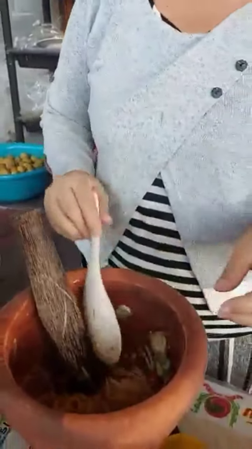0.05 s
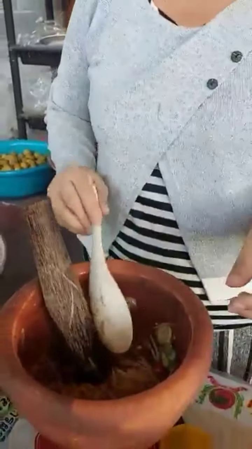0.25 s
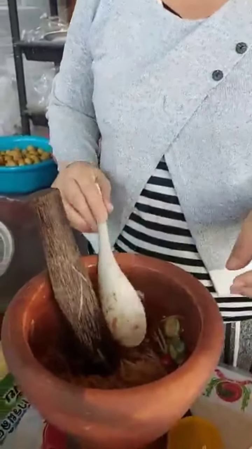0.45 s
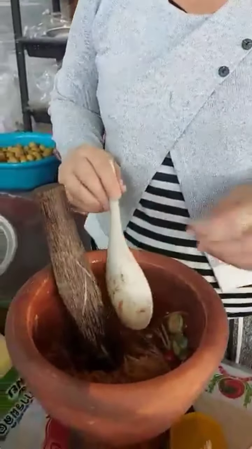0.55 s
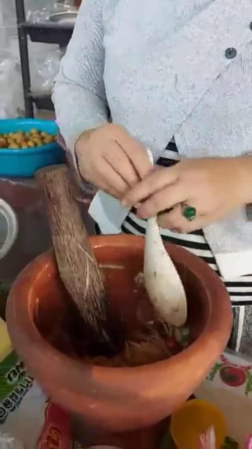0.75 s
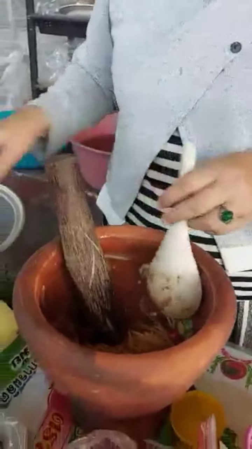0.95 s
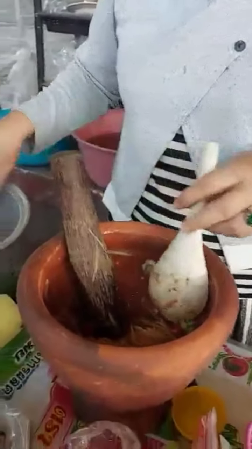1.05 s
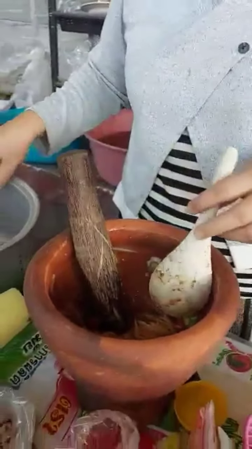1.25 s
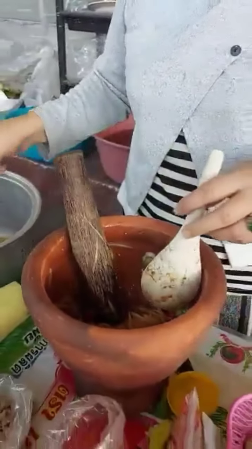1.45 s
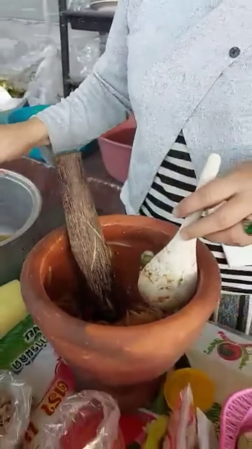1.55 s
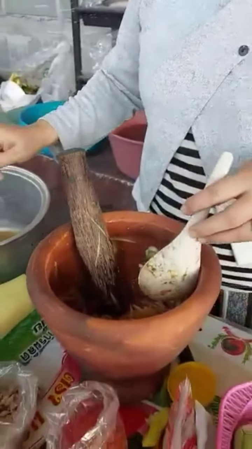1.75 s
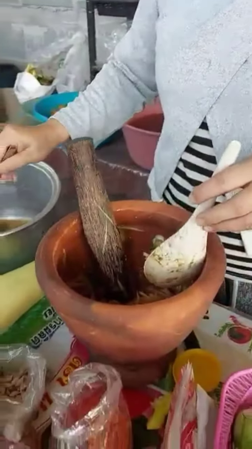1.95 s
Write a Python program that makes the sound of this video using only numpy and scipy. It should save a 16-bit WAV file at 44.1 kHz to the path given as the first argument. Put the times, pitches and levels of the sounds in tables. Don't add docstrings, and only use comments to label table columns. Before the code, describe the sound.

A plastic spoon knocks hard on a clay mortar, with wet scrapes and faint outdoor hiss.

```python
import sys
import numpy as np
from scipy import signal
from scipy.fft import rfft, irfft
from scipy.io import wavfile
from scipy.ndimage import uniform_filter1d

SR = 44100
rng = np.random.default_rng(int(sys.argv[2]) if len(sys.argv) > 2 else 0)


def magnitude_from_level(level_db):
    exponent = np.asarray(level_db, float) / 20
    return 10 ** exponent


def put_to_file(sound):
    columns = np.atleast_2d(sound).T
    safe = np.clip(columns, -1, 1)
    whole_steps = np.round(safe * 32767)
    wavfile.write(sys.argv[1], SR, whole_steps.astype(np.int16))


N = 88200
SIDES = np.array([[.5], [-.5]])


def evened(x):
    return x / np.sqrt(np.mean(x ** 2) + 1e-20)


def read(points, hz):
    f, value = np.transpose(points)
    return np.interp(np.log(hz + 1), np.log(f + 1), value)


def add(mix, s, sound):
    part = mix[:, round(s * SR):][:, :sound.shape[-1]]
    part += sound[..., :part.shape[1]]


def ring(hz, db, t60, pan_db=0, lead=0, rise=.0003, settle=1):
    t = np.arange(SR // 2) / SR
    muting_db = 330 * np.maximum(t - settle, 0)
    fade = magnitude_from_level(db + pan_db * SIDES - 60 * t / t60 - muting_db) * (1 - np.exp(-t / rise))
    return fade * np.sin(2 * np.pi * hz * t + lead * SIDES)


def resonate(x, hz, width):
    turn = np.exp(2j * np.pi * np.cumsum(hz * np.ones(len(x))) / SR)
    r = np.exp(-np.pi * width / SR)
    smooth = signal.lfilter([1], np.convolve([1, -r], [1, -r]), x / turn)
    return 2 * (turn * smooth).real


def coloured(x, gain_of_hz):
    return irfft(rfft(x) * gain_of_hz(np.fft.rfftfreq(x.shape[-1], 1 / SR)), x.shape[-1])


# frequency in Hz, level in dB per Hz.
AIR_COLOUR = [(76, -55.5), (130, -18.5), (239, -2.5), (421, -12.5), (576, -15), (2810, -20.5),
              (7930, -32.5), (12400, -26.5), (14000, -67.5)]
# frequency in Hz, likeness from 0 to 1.
AIR_LIKENESS = [(60, 0.78), (180, 0.81), (550, 0.34), (1650, 0.01), (4970, 0.016), (15000, 0.11)]


def air():
    frames, hz = N // 256 + 5, np.fft.rfftfreq(1024, 1 / SR)
    a, b, c, d, patches = rng.standard_normal((frames, 513, 5)).T
    patches = uniform_filter1d(patches, size=12, axis=0)
    patches = evened(uniform_filter1d(patches, size=9, axis=1))
    same = np.clip(read(AIR_LIKENESS, hz), -1, 1)[:, None]
    left = a + 1j * b
    right = same * left + np.sqrt(1 - same ** 2) * (c + 1j * d)
    colour_db = read([(30, -47.5), (70, -14)] + list(AIR_COLOUR), hz)[:, None]
    z = np.array([left, right]) * magnitude_from_level(colour_db + 2.4 * patches)
    return magnitude_from_level(-56.5) * evened(signal.istft(z, nperseg=1024, noverlap=768)[1][:, :N])


# frequency in Hz, level in dB, t60 in seconds.
EXHAUST_MODES = [(103.5, -32, 0.1), (141, -67.5, 0.082), (230, -49, 0.093)]
FIRST_FIRE_S, FIRE_GAP_S, FIRE_JITTER_S, OFFBEAT_DB = 0.01586, .0773, 0.0043, -9
# centre in seconds, half length in seconds, level in dB.
RUMBLE_SWELLS = [
    (0.225, 0.059, -38.5),
    (0.844, 0.036, -46.5),
    (1.047, 0.068, -45),
    (1.86, 0.068, -46),
    (1.99, 0.0297, -44.5),
]


def engine():
    out = np.zeros((2, N))
    puff = sum(ring(*mode, rise=0.011) for mode in EXHAUST_MODES)
    for k, late in enumerate(rng.standard_normal(52)):
        start = abs(FIRST_FIRE_S + k * FIRE_GAP_S / 2 + FIRE_JITTER_S * late)
        add(out, start, magnitude_from_level(OFFBEAT_DB * (k % 2)) * puff)
    t = np.arange(N) / SR
    wobble = resonate(rng.standard_normal(N), hz=48.6, width=36.6)
    wobble /= np.sqrt(uniform_filter1d(wobble ** 2, size=4000))
    swells = sum(magnitude_from_level(db) * np.exp(-((t - s) / half) ** 2) for s, half, db in RUMBLE_SWELLS)
    return out + wobble * (magnitude_from_level(-54.5) + swells)


# time in seconds, pitch in Hz, level in dB.
SQUEAL_PATH = [(1.5, 10000, -90), (1.56, 10200, -73), (1.66, 10400, -73), (1.74, 11800, -70),
               (1.81, 10900, -72), (1.9, 11200, -75), (2, 11500, -82)]


def squeal():
    s, hz, db = np.transpose(SQUEAL_PATH)
    t = np.arange(N) / SR
    pitch = uniform_filter1d(np.interp(t, s, hz), size=1500)
    voices = np.array([resonate(v, pitch, 220) for v in rng.standard_normal((2, N))])
    return magnitude_from_level(np.interp(t, s, db)) * evened(voices)


# start in seconds, length in seconds, level in dB,
# then start, middle and end pitch in Hz.
CHICK_CALLS = [
    (1.556, 0.091, -58, 4160, 3680, 2780),
    (1.607, 0.034, -55, 1260, 1163, 1060),
    (1.74, 0.09, -57, 3430, 4070, 3100),
    (1.921, 0.039, -56.5, 4330, 4460, 4500),
]


def chick():
    out = np.zeros((2, N))
    for (s, length, db, *hz), breath in zip(CHICK_CALLS, rng.standard_normal((len(CHICK_CALLS), 2, 5000))):
        u = np.linspace(0, 1, round(length * SR))
        glide = np.polyval(np.polyfit([0, .5, 1], hz, deg=2), u)
        width = .125 * hz[1]
        call = evened(np.array([resonate(v[:len(u)], glide, width) for v in breath]))
        add(out, s, magnitude_from_level(db) * np.sin(np.pi * u) ** 0.46 * call)
    return out


# frequency in Hz, level in dB, t60 in seconds.
PAN_MODES = [(885, -52, 0.25), (1755, -52, 0.27), (2085, -53.5, 0.3), (2920, -49.5, .06),
             (3190, -53, 0.068), (3650, -54.5, 0.11), (4210, -56, .08), (4500, -56.5, .1),
             (4900, -57, 0.11), (5230, -56.5, 0.083), (6000, -58, 0.2), (2336, -60, .3), (3854, -59, .09),
             (6476, -60, .15)]
PAN_S, RATTLE_S, RATTLES_PER_S, FIRST_BLOW = 1.8195, .06, 150, 2.4


def pan():
    out = np.zeros((2, N))
    chance, size = rng.random((2, 8000))
    rattle = (chance < RATTLES_PER_S / SR) * (2 * size - 1) * (np.arange(8000) < RATTLE_S * SR)
    rattle[0] = FIRST_BLOW
    modes = sum(ring(*mode, pan_db=-0.5, lead=1.76 * rng.standard_normal(), rise=0.00085)
                for mode in PAN_MODES)
    add(out, PAN_S, signal.fftconvolve(modes, rattle[None], axes=1))
    return out


# start in seconds, level in dB, pitch in Hz, t60 in seconds.
SINGLE_RINGS = [(1.2615, -38.5, 480, 0.04), (1.2625, -43, 693, 0.059), (1.263, -46, 220, 0.05),
                (1.264, -50.5, 1633, 0.038), (1.3, -50, 338, .1), (1.353, -40.5, 323, 0.096),
                (1.377, -42, 356, 0.089), (1.36, -56.5, 700, 0.12), (1.831, -44.5, 333, 0.54),
                (1.914, -46, 339, 0.15), (.147, -36, 790, .04), (.155, -42, 700, .05), (.184, -42, 880, .05),
                (1.03, -48, 215, .1), (1.04, -53, 650, .08), (1.822, -46, 225, .1), (.9172, -36, 1790, .03),
                (.9172, -37, 1120, .035), (.9172, -39, 1480, .025), (.2158, -16, 1010, .02),
                (.2158, -26, 560, .03), (.4268, -9, 2790, .028), (.4256, -17, 5500, .014),
                (.4256, -22, 6500, .012), (.3976, -24, 1000, .02), (.428, -30, 1770, .1),
                (.462, -36, 2900, .08), (.497, -49, 2075, 0.2), (.556, -49, 1920, 0.15),
                (1.862, -52, 2960, .1), (1.903, -53, 3780, .05)]


def single_rings():
    out = np.zeros((2, N))
    for s, db, hz, t60 in SINGLE_RINGS:
        add(out, s, ring(hz, db, t60, pan_db=1.0, lead=-.1, rise=0.0012))
    return out


# start in seconds, length in seconds, level in dB,
# centre in Hz, width in octaves.
WET_SCRAPES = [(0.027, 0.064, -51.5, 8940, 3), (0.15, 0.11, -45, 2175, 1.63),
               (0.145, 0.0048, -36.5, 2580, 0.68), (0.1546, 0.0099, -43, 3260, 0.4),
               (.428, 0.033, -42.5, 5040, 0.25), (1.288, 0.029, -57.5, 3000, 0.75),
               (0.175, 0.022, -44, 1676, 0.69), (.211, 0.019, -34, 3940, 0.56),
               (0.3934, 0.0047, -35, 6000, 3.8), (0.3962, 0.0047, -21, 8050, 1.1),
               (0.235, 0.0089, -46, 4300, 0.6), (0.252, 0.013, -41.5, 5520, 0.33),
               (0.234, 0.081, -49, 4500, 1.6), (0.402, 0.081, -37, 2970, 1.13),
               (0.426, 0.11, -43, 4000, 0.68), (0.542, 0.039, -51.5, 6970, 1.7),
               (0.578, 0.35, -57, 4480, 0.3), (0.722, 0.22, -54.5, 8000, 3.5),
               (1.004, 0.133, -48.5, 6000, 3.7), (1.014, 0.1, -48.5, 2960, 0.49),
               (1.031, 0.065, -46, 1990, 0.29), (1.2078, 0.0092, -48, 6400, 1.6),
               (1.263, 0.011, -44, 7000, 6.5), (0.221, 0.095, -40, 453, 1.43),
               (0.429, 0.11, -44.5, 450, 0.47), (1.356, 0.056, -55, 7000, 2.4),
               (1.8107, 0.052, -42, 7060, 1.4), (1.825, 0.28, -52, 1400, 1.4),
               (1.886, 0.07, -49.5, 1433, 1.1)]


def scrapes():
    out = np.zeros((2, N))
    draws = rng.standard_normal((len(WET_SCRAPES), 3, 10000))
    for (s, length, db, hz, octaves), (left, right, clumps) in zip(WET_SCRAPES, draws):
        u = np.arange(min(round(length * SR), 10000)) / (length * SR)
        grain = magnitude_from_level(0.55 * evened(uniform_filter1d(clumps, size=60)))
        noise = coloured(np.array([left, right]) * grain,
                         lambda f: np.exp(-.5 * (np.log2((f + 1) / hz) / octaves) ** 2))
        shape = np.minimum(u / .15, 1) * np.cos(np.pi / 2 * u) ** 1.2
        add(out, s, evened(noise)[:, :len(u)] * shape * magnitude_from_level(db))
    return out


# frequency in Hz, level in dB, t60 in seconds,
# left-right difference in dB, left lead in radians.
SPOON_MODES = [(156, -28, 0.16, -3, 1), (514, -28.5, 0.083, 5, -1.85), (710, -25, 0.039, -14.5, -3),
               (1059, -4.5, 0.036, 3, 1.02), (1763, -7.5, 0.031, 0.5, 1.32), (2348, -1, 0.021, 9.5, -1.5),
               (2550, -5, 0.034, -1, -0.3), (2923, -7, 0.024, -3.5, 0.2), (3380, -20, 0.017, 0.5, -3.5),
               (3780, -7.5, 0.017, -10, -0.3), (4806, 8, 0.0075, 5.5, 3), (5180, -20.5, 0.013, 8, -4.5),
               (4360, -16, .011, 1.5, 9.2), (6170, -8.5, 0.013, 4.5, 3.47)]
PRESSED_DB, PRESSED_RING = -25, .5


def spoon(body_db, high_db, crack_db):
    softness_db = min(crack_db - body_db + 16.5, 0)
    stretch = PRESSED_RING if high_db - body_db < PRESSED_DB else 1
    out = 0
    for hz, db, t60, *sides in SPOON_MODES:
        tilt_db = 0.858 * softness_db * max(np.log2(hz / 2000), 0)
        scatter_db = 1.5 * rng.standard_normal()
        out = out + ring(hz, body_db + db + scatter_db + tilt_db, t60 * stretch, *sides, rise=0.002)
    return out


# frequency in Hz,
# level in dB, t60 in seconds, left-right difference in dB, left lead in radians.
WALL_RINGS = [(901, 2, 0.29, -.5, -1.02), (2348, -7.5, .135, 18, 0), (2348, -11, .31, -22, 0),
              (2334, -20, .3, -22, -3.4), (4230, -23, 0.15, -10, 1.4), (2344, -27, .55, -8, 0)]
LET_GO_S, LIGHT_RING = .6, 1.82
SETTLE_S = .103


def mortar_wall(s, low_db, high_db):
    lightness = LIGHT_RING if s > LET_GO_S else 1
    out = 0
    for k, (hz, db, t60, *sides) in enumerate(WALL_RINGS):
        level_db = db + (low_db if k == 0 else high_db)
        stretch = lightness if k == 0 else 1
        settle = 1 if k == len(WALL_RINGS) - 1 else SETTLE_S * lightness
        out = out + ring(hz, level_db, t60 * stretch, *sides, rise=0.0024, settle=settle)
    return out


# frequency in Hz, level in dB.
CRACK_COLOUR = [(1500, 1.5), (4000, 7.5), (7000, -10.5), (10000, -2.5), (13000, -24), (15500, -38)]


def crack(crack_db):
    t = np.arange(2048) / SR
    grit = coloured(rng.standard_normal((2, len(t))), lambda hz: magnitude_from_level(read(CRACK_COLOUR, hz)))
    return evened(grit) * magnitude_from_level(crack_db + 1.5 * SIDES - 60 * t / 0.016)


# start in seconds, then levels in dB of spoon body, low wall ring,
# high wall ring and crack.
SPOON_KNOCKS = [(.1468, -17, -64, -63.5, -36.5), (.1545, -31, -64, -56.5, -36),
                (.181, -40, -59.5, -57, -59), (.1853, -22.5, -58.5, -51, -45.5),
                (.192, -44, -61, -53, -61.5), (0.2154, -3.5, -23, -16, -18),
                (0.3974, -7.5, -87, -43.5, -18), (.4238, -22, -23, -19, -28),
                (0.4254, -5.5, -22.5, -15.5, -11), (.917, -25, -41.5, -46.5, -78),
                (.9593, -41.5, -46, -51, -43.5)]


def knocks():
    out = np.zeros((2, N))
    for s, body_db, low_db, high_db, crack_db in SPOON_KNOCKS:
        add(out, s, spoon(body_db, high_db, crack_db))
        add(out, s, mortar_wall(s, low_db, high_db))
        add(out, s, crack(crack_db))
    return out


# frequency in Hz, t60 in seconds.
YARD_DECAY = [(1000, 0.27), (3000, 0.33), (8000, 0.033)]


def yard(x):
    taps = np.zeros((2, SR // 2))
    at = np.arange(640, SR // 2 - 20, 20)
    places = at + rng.integers(0, 20, (2, len(at)))
    np.put_along_axis(taps, places, rng.choice([-1., 1.], (2, len(at))), 1)
    hz, t, z = signal.stft(taps, SR, nperseg=256)
    tail = signal.istft(z * magnitude_from_level(-60 * t / read(YARD_DECAY, hz)[:, None]), SR, nperseg=256)[1]
    return signal.fftconvolve(x, tail / np.linalg.norm(tail[0]), axes=1)[:, :N]


def scene():
    far = air() + engine() + squeal() + chick()
    near = pan() + single_rings() + scrapes() + knocks()
    echo = yard(coloured(near, lambda hz: hz / (hz + 500)))
    return far + near + magnitude_from_level(-20.5) * echo


def top_cut(x):
    return signal.sosfilt(signal.butter(12, 15620, fs=SR, output="sos"), x)


# frequency in Hz, gain in dB.
MIC_COLOUR = [(25, -36.5), (45, 0.5), (12500, 1), (13100, -28.5)]


def record(dry):
    side = coloured((dry[0] - dry[1]) / 2, lambda hz: 1 / (1 + (hz / 220) ** 2))
    heard = coloured(dry - np.array([side, -side]), lambda hz: magnitude_from_level(read(MIC_COLOUR, hz)))
    return top_cut(np.tanh(heard / 1.4) * 1.634)


dry = scene()
out = record(dry)
put_to_file(out)
```